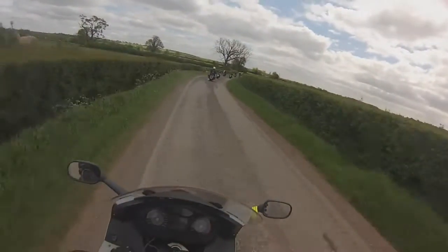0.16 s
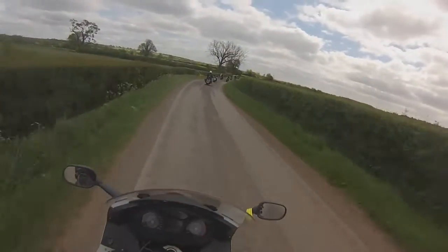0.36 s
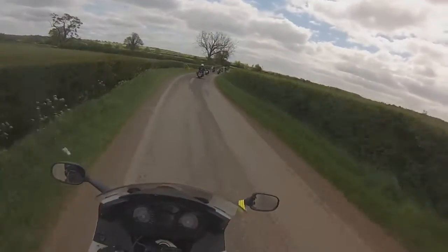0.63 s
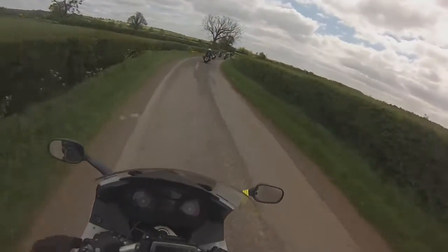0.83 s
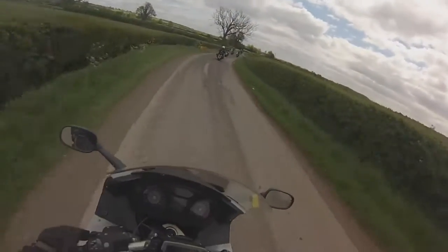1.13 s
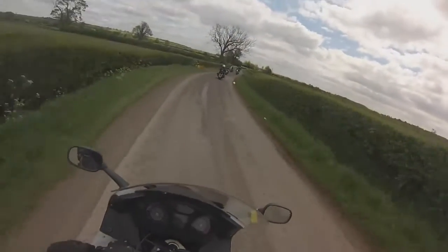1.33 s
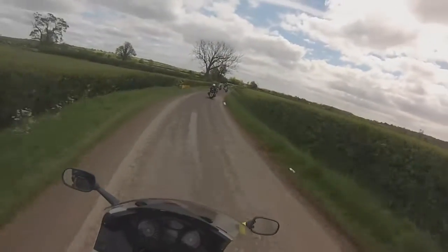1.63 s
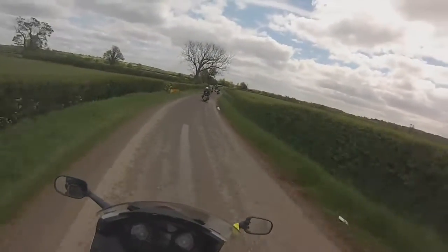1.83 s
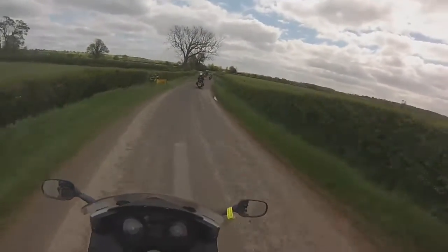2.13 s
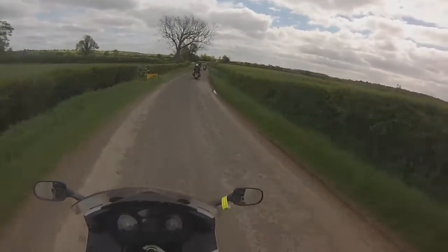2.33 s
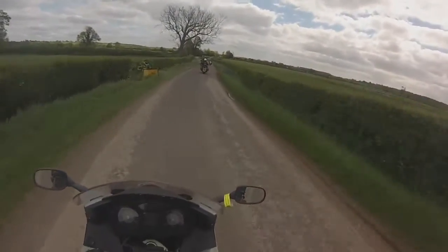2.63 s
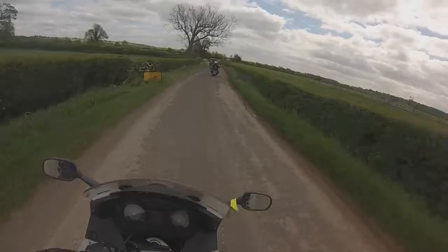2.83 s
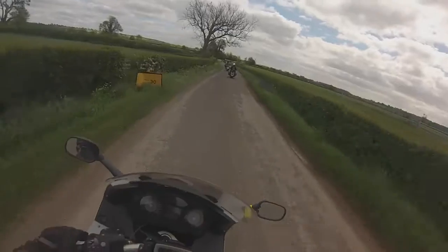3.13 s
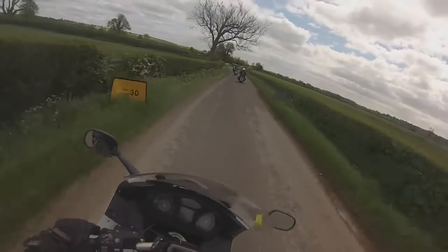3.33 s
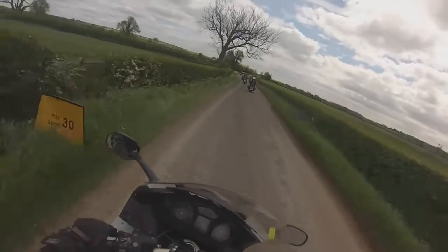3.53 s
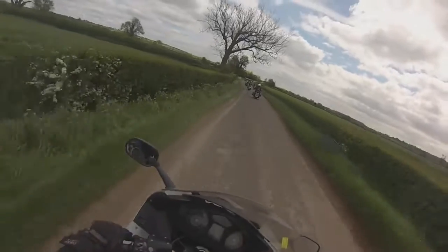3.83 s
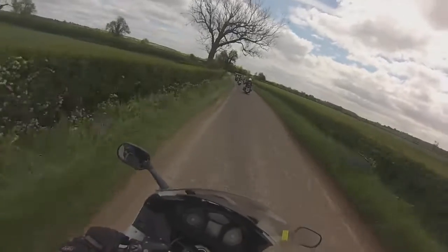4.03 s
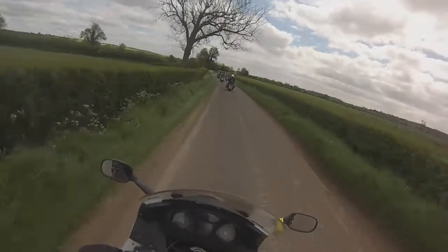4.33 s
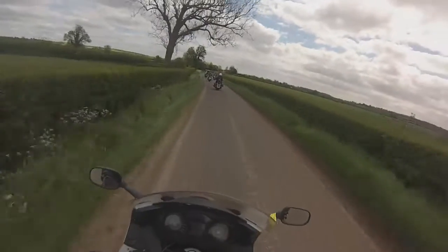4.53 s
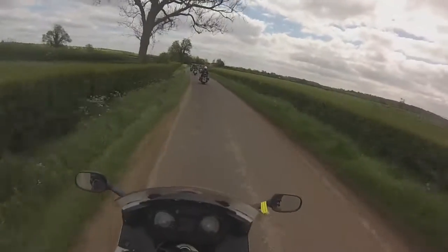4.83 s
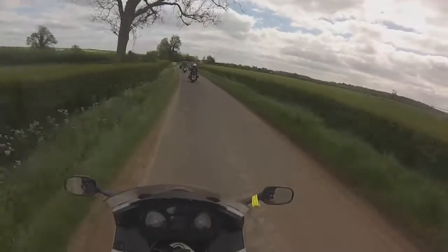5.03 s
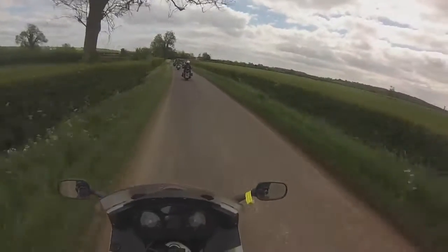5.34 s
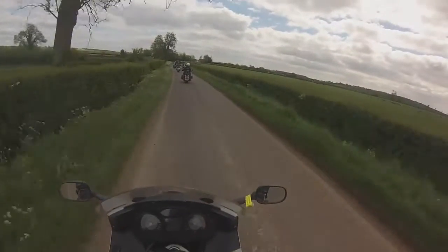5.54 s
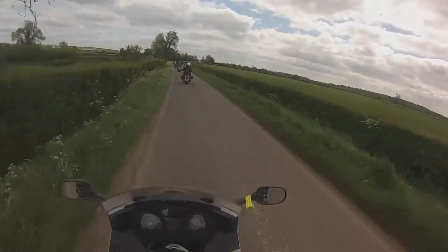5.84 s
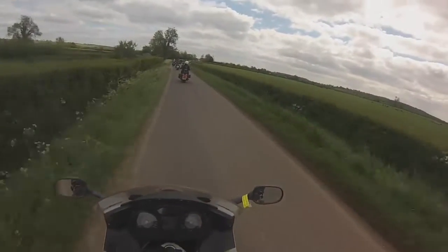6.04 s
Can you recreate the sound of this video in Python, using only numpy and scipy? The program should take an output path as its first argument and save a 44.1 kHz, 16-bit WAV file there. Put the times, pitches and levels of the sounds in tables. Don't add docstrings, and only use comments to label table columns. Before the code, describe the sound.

A motorcycle cruises at steady speed on an open country lane, heard from a camera in a closed case on the rider's helmet. Deep wind rumble and fluttering buffets dominate, with boxy rushing air and a low exhaust drone that surges and fades. A thin, faint high whistle wavers early, turns breathy and disappears near four seconds; then wind, hollow hums and drone grow stronger until the end.

```python
import sys
import numpy as np
from scipy import signal
from scipy.io import wavfile

SR = 44100
rng = np.random.default_rng(int(sys.argv[2]) if len(sys.argv) > 2 else 0)


def unload_wav(signal):
    wavfile.write(
        sys.argv[1],
        SR,
        np.round(np.clip(np.atleast_2d(signal).T, -1, 1) * 32767).astype(np.int16),
    )


def volts(x):
    e = np.asarray(x, float) / 20
    return 10 ** e


N = 272097


def rms_one(x):
    return x / np.sqrt(np.mean(x ** 2) + 1e-20)


def in_time(rows):
    s, *columns = np.transpose(rows)
    return [np.interp(np.arange(N) / SR, s, column) for column in columns]


def swells(rows, squareness):
    s = np.arange(N) / SR
    coarse = np.arange(0, N + 32, 32) / SR
    humps = []
    for middle, length, *_ in rows:
        hump = np.exp(-np.abs(2 * (coarse - middle) / length) ** squareness)
        humps.append(np.interp(s, coarse, hump))
    return np.array(humps)


def drift(rate):
    r = np.exp(-80 * np.pi * rate / SR)
    noise = rng.standard_normal(N // 40 + 2002)
    slow = signal.lfilter([1], [1, -2 * r, r * r], noise)[2000:]
    return np.interp(np.arange(N) / 40, np.arange(len(slow)), rms_one(slow))


def bands(spectrum, edges):
    white = rng.standard_normal((2, N + SR))
    hz_points, db_points = np.transpose(spectrum)
    for k, (low, high) in enumerate(zip(edges, edges[1:])):
        centre = np.sqrt(low * high)
        band_filter = signal.butter(2, [low, high], "band", fs=SR, output="sos")
        band = signal.sosfilt(band_filter, white[k % 2])[SR:]
        yield centre, band * volts(np.interp(np.log(centre), np.log(hz_points), db_points))


def wavering_tone(hz, wander, rate, rough, flicker_db):
    phase = 2 * np.pi * np.cumsum(hz * (1 + wander * drift(rate))) / SR
    narrow = drift(rate) * np.sin(phase) + drift(rate) * np.cos(phase)
    tone = np.sqrt(2) * np.sin(phase) * volts(flicker_db * drift(rate))
    return rms_one(tone + rough * narrow), phase


# time in seconds, pitch in Hz, level in dB.
GAP_WHISTLE = [(0, 3700, -84), (.5, 3785, -76), (.8, 3805, -74.5), (1.15, 3785, -75), (1.45, 3756, -73),
               (1.72, 3735, -76), (1.82, 3745, -95), (2.13, 3715, -95), (2.19, 3710, -73.5),
               (2.54, 3735, -73), (2.65, 3830, -84), (2.69, 3715, -73), (3.04, 3800, -73.5),
               (3.17, 3860, -86), (3.24, 3980, -74), (3.5, 4040, -71), (3.8, 4120, -73), (4.1, 4050, -76.5)]


def whistle():
    hz, level_db = in_time(GAP_WHISTLE)
    breath = np.interp(np.arange(N) / SR, [3.5, 3.9], [0.38, 6.0])
    tone, _ = wavering_tone(hz, wander=.003 * (1 + breath), rate=30.0, rough=1.6 * breath, flicker_db=1.6)
    power = 1 + 2 * breath ** 2
    return volts(level_db) * np.sqrt(np.mean(power) / power) * tone


# time in seconds, level of the rush in dB.
AIRFLOW = [(0.0, -66.5), (0.45, -64.5), (1.05, -65), (1.22, -63), (1.6, -64), (1.92, -66), (3.45, -63),
           (3.66, -60.5), (3.86, -62), (4.28, -60.5), (4.81, -56.5), (5.14, -58.5), (5.72, -56.5),
           (6.17, -59.5)]


def air_swing():
    rush_db, = in_time(AIRFLOW)
    return rush_db - rush_db.mean()


# middle in seconds, length in seconds, boost in dB.
LOWER_MODE_SINGS = [
    (.55, .2, 2),
    (3.612, 0.12, 15.5),
    (3.93, 0.22, 10),
    (4.225, 0.09, 13),
    (4.45, 0.11, 8.5),
    (4.843, .12, 6),
    (5.006, 0.096, 9),
    (5.7, 0.18, 2),
]
UPPER_MODE_SINGS = [
    (.4, 0.17, 4),
    (1.56, .1, 9.8),
    (1.86, .24, 8),
    (2.3, 0.46, 7.2),
    (3.85, 0.23, 3.45),
    (4.37, .2, 6.9),
    (4.97, 0.09, 4.2),
    (5.86, .15, 3.07),
]


def hollow_tones():
    low, _ = wavering_tone(700, wander=.012, rate=28.0, rough=3.0, flicker_db=1.5)
    high, _ = wavering_tone(1610, wander=.008, rate=45.0, rough=3.0, flicker_db=2.5)
    low_boost_db = np.transpose(LOWER_MODE_SINGS)[2] @ swells(LOWER_MODE_SINGS, 1.2)
    high_boost_db = np.transpose(UPPER_MODE_SINGS)[2] @ swells(UPPER_MODE_SINGS, 2.2)
    low_db = -72 + 1.34 * air_swing() + low_boost_db
    high_db = -73 + 0.43 * air_swing() + high_boost_db
    return volts(low_db) * low + volts(high_db) * high


# middle in seconds, length in seconds, boost in dB, extra treble in dB.
HARD_GUSTS = [(0.71, .2, 1.5, 0.5), (1.24, 0.14, 0.5, -2.5), (2.148, 0.05, 2, 0), (2.338, 0.034, 3.5, -3),
              (2.939, 0.17, 2.5, -1), (3.143, .06, 4.5, -2), (3.33, 0.079, 1.5, 1), (3.597, 0.3, 2, 1),
              (3.917, 0.03, 4, -1), (4.123, 0.044, -0.5, 0), (4.82, 0.16, 3.5, 2), (5.017, 0.06, 4.5, 2.5),
              (5.37, 0.11, 1, 0), (5.566, 0.1, -0.5, 1.5), (5.8, 0.17, 1, 1.5), (6.016, 0.11, 2, 1.5)]


def gusts():
    return np.transpose(HARD_GUSTS)[2:] @ swells(HARD_GUSTS, 3.5)


# pitch in Hz, width in Hz, lift or cut in dB.
CASE_MODES = [(501.8, 30, 6.5), (690, 140, 2.5), (1089, 60, 4), (1248, 204, -4), (1604, 210, 4),
              (1785, 38, -8.5), (2270, 280, 3), (2866, 104, 4), (3183, 210, -5.5), (4160, 360, 2.5),
              (4600, 230, -1), (5230, 730, 4.5), (5600, 300, 0), (6190, 710, 6), (7130, 570, 9),
              (9520, 270, 6.5), (11420, 1000, 10)]


def case(x):
    for hz, width_hz, db in CASE_MODES:
        w = 2 * np.pi * hz / SR
        a = volts(db / 2)
        k = np.sin(w) * width_hz / hz / 2
        x = signal.lfilter([1 + k * a, -2 * np.cos(w), 1 - k * a],
                           [1 + k / a, -2 * np.cos(w), 1 - k / a], x)
    return x


# pitch in Hz, strength in dB per Hz.
RUSH_COLOUR = [(120, -31), (200, -3.5), (380, -8), (501, -4), (773, -8.5), (1070, -6), (1260, -9.5),
               (1600, -10), (1810, -9.5), (2300, -10), (3200, -15), (6190, -30.5), (12600, -49.5),
               (16400, -86), (22000, -120)]
GUST_TURNS_HZ = (900, 1800, 4000, 9000)


def rush(shared_db=0.39, own_db=1.09):
    swing_db = air_swing()
    colour = list(RUSH_COLOUR[:-1]) + [(17000, RUSH_COLOUR[-2][1] - 3.0)]
    boost_db, treble_db = gusts()
    eddies = drift(40.0) + 0.92 * drift(7.3)
    low_db = (0.82 - 1) * swing_db - 0.25 * boost_db + .5 * drift(13.0)
    high_db = (1.15 - 1) * swing_db + treble_db + 1.0 * drift(24.0)
    out = 0
    for hz, band in bands(colour, 200 * 2 ** np.arange(0, 6.4, 1 / 3)):
        low_share = np.interp(np.log(hz), np.log(GUST_TURNS_HZ[:2]), [1, 0])
        high_share = np.interp(np.log(hz), np.log(GUST_TURNS_HZ[2:]), [0, 1])
        tilt_db = low_share * low_db + high_share * high_db + boost_db
        out = out + band * volts(tilt_db + shared_db * eddies + own_db * drift(14.0))
    return volts(swing_db - 56.5) * rms_one(case(out))


# pitch in Hz, strength in dB per Hz.
RUMBLE_COLOUR = [(7.1, -32), (12, -6), (32, -0.5), (52, -2), (66, -5), (87, -12), (144, -5.5), (203, -28.5),
                 (320, -41), (420, -62), (700, -120)]
# middle in seconds, length in seconds, pitch in Hz, boost in dB.
WIND_THUMPS = [(0.306, 0.086, 69.5, 1), (0.356, 0.24, 175, 1.5), (0.767, 0.071, 75, 8.5),
               (1.07, 0.21, 165, 5), (1.7, 0.11, 58, 2.5), (2.193, 0.19, 56, 2.5), (2.263, 0.097, 171, 2),
               (2.747, 0.81, 190, 5.5), (3.436, 0.16, 54.6, 2), (4.31, 0.27, 84, 7), (4.708, 0.25, 91, 8),
               (2.3, 0.66, 85, -4), (4.996, 0.33, 70, 8.5), (4.95, 0.23, 155, 1), (5.287, 0.25, 165, 7),
               (5.3, 0.053, 89, 13), (5.777, 0.075, 170, 6), (3.793, 0.58, 185, 0), (4.5, 0.45, 196, -4),
               (6.01, 0.27, 162, 5)]


def rumble():
    _, _, thump_hz, boost_db = np.transpose(WIND_THUMPS)
    humps = swells(WIND_THUMPS, 1.9)
    swing_db = 0.74 * air_swing()
    out = 0
    for hz, band in bands(RUMBLE_COLOUR, 12 * 2 ** np.arange(0, 5, 1 / 3)):
        near = np.exp(-(np.log2(hz / thump_hz) / 0.5) ** 2)
        lumps_db = 1 * drift(3.8)
        out = out + band * volts(swing_db + boost_db * near @ humps + lumps_db)
    return volts(-45.0) * rms_one(out)


# time in seconds, firings a second in Hz.
ENGINE_SPEED = [
    (0, 131),
    (.9, 125.9),
    (1.3, 135),
    (1.7, 127.4),
    (2.4, 131),
    (3.2, 125.5),
    (4.3, 121.5),
    (5.2, 124.1),
    (5.7, 126.8),
    (6.17, 126.6),
]
# middle in seconds, length in seconds, peak level in dB.
DRONE_SWELLS = [(0.073, 0.086, -50.5), (0.273, 0.12, -49), (0.585, 0.17, -48.5), (0.739, 0.088, -48),
                (0.876, 0.049, -43), (1.05, 0.11, -53.5), (1.347, 0.1, -46), (1.546, 0.17, -66),
                (1.78, 0.14, -55), (2.114, 0.44, -61), (2.357, 0.12, -46.5), (2.675, 0.52, -57),
                (3.15, 0.16, -47), (3.41, .36, -58), (3.74, 0.2, -53), (3.959, 0.097, -42.5),
                (4.082, .08, -60), (4.271, 0.058, -45.5), (4.512, 0.13, -39.5), (4.72, 0.074, -39),
                (4.86, .14, -36.5), (5.053, 0.2, -41), (5.309, .16, -44.5), (5.499, 0.15, -47.5),
                (5.624, 0.17, -52.5), (5.898, 0.37, -42), (6.17, 0.073, -47)]


def engine():
    hz, = in_time(ENGINE_SPEED)
    drone, phase = wavering_tone(hz, wander=.03, rate=14.0, rough=.55, flicker_db=1.2)
    octave = volts(-23) * drift(5.2) * np.sin(2 * phase)
    peak = volts(np.transpose(DRONE_SWELLS)[2] - 2.45)
    level = volts(-65) + peak @ swells(DRONE_SWELLS, 2.9)
    return level * (drone + octave)


# middle in seconds, length in seconds, peak level in dB, vortices a second in Hz.
VORTEX_TRAINS = [(0.113, 0.063, -44, 39.26), (0.45, 0.38, -37.5, 38.48), (0.604, 0.076, -41, 36.9),
                 (0.766, .11, -37.5, 35.97), (0.94, 0.13, -38.5, 35.9), (1.055, 0.064, -38.5, 35),
                 (1.31, 0.24, -31.5, 36.66), (1.537, 0.15, -36, 37.2), (1.717, 0.18, -42, 36.9),
                 (2.004, 0.19, -44.5, 35.7), (2.21, .12, -41.5, 36.9), (2.36, .12, -41, 37.54),
                 (2.582, 0.27, -41, 38.18), (2.96, .24, -42, 39.77), (3.25, .25, -45.5, 36.08),
                 (3.54, 0.09, -36.5, 38.35), (3.751, .25, -38.5, 34.44), (3.961, 0.22, -42.5, 35),
                 (4.127, 0.094, -34.5, 35.8), (4.228, 0.059, -38.5, 37.13), (4.349, 0.061, -42, 36.9),
                 (4.568, 0.38, -30.5, 36.95), (4.796, .13, -30.5, 36.83), (5.026, 0.1, -44, 38.1),
                 (5.169, 0.17, -39.5, 36.35), (5.413, 0.15, -31, 38.5), (5.582, 0.12, -31, 39.5),
                 (5.726, 0.14, -36, 41), (5.983, 0.23, -35, 38.64), (6.153, 0.15, -35, 37.8)]


def buffeting():
    at, _, peak_db, train_hz = np.transpose(VORTEX_TRAINS)
    hz = np.interp(np.arange(N) / SR, at, train_hz)
    push, _ = wavering_tone(hz, wander=.04, rate=6.0, rough=.25, flicker_db=.5)
    level = volts(-65.5) + volts(peak_db) @ swells(VORTEX_TRAINS, 2.4)
    return level * push


def scene():
    mix = buffeting() + engine() + rumble() + rush() + hollow_tones() + whistle()
    return mix[None]


# pitch in Hz, dB over the band's usual level.
TOP_BAND_NEEDS = [(10400, -14), (12700, -12), (12850, 0), (13300, 1), (13550, 4.5), (14300, 6),
                  (14900, 8.5)]
# middle in seconds, length in seconds, rise of the needed level in dB.
TREBLE_DROPOUTS = [
    (.37, .04, 11),
    (1.0, .22, 4),
    (1.3, .14, 13),
    (1.5, .08, 13),
    (1.95, .7, -1.5),
    (2.65, .4, 3),
    (4.6, .2, 3),
    (4.83, .14, -3),
    (5.02, .08, -3),
    (5.8, .14, -2),
]


def drop_weak_top(x, size=2048, count=6):
    padded = np.pad(x, (0, 2 * size), "reflect", reflect_type="odd")
    hz, s, frames = signal.stft(padded, SR, nperseg=size)
    raised_db = np.transpose(TREBLE_DROPOUTS)[2] @ swells(TREBLE_DROPOUTS, 4)
    raised_db = np.interp(s, np.arange(N) / SR, raised_db)
    keep = np.ones(frames.shape)
    for k in range(np.searchsorted(hz, TOP_BAND_NEEDS[0][0]), len(hz), count):
        power = np.sum(np.abs(frames[k:k + count]) ** 2, axis=0)
        level_db = 10 * np.log10(power + 1e-20)
        need_db = np.interp(hz[k], *np.transpose(TOP_BAND_NEEDS), right=99)
        lift = volts(3.0 if need_db > -5 else 0)
        keep[k:k + count] = lift * (level_db > np.median(level_db) + need_db + raised_db)
    return signal.istft(frames * keep, SR, nperseg=size)[1][:N]


def top_cut(x):
    return signal.sosfilt(signal.butter(12, 14670, fs=SR, output="sos"), x)


def record(dry):
    hiss = volts(-82) * rng.standard_normal(N)
    left_s = np.arange(N)[::-1] / SR
    fade = np.sin(np.pi / 2 * np.minimum(left_s / 0.006, 1))
    finished = fade * drop_weak_top(dry[0] + hiss)
    return top_cut(finished[None])


dry = scene()
out = record(dry)
unload_wav(out)
```